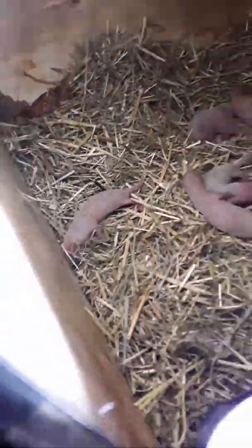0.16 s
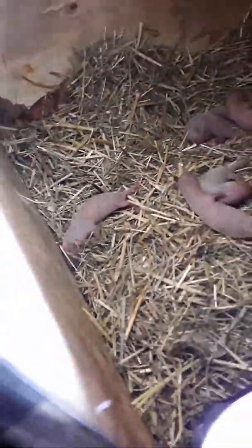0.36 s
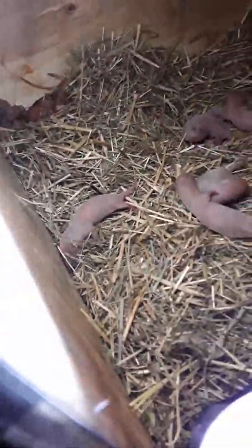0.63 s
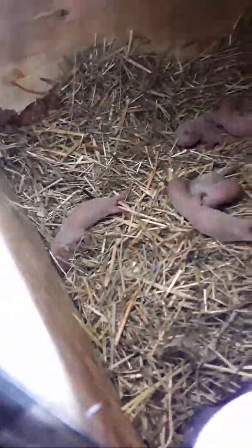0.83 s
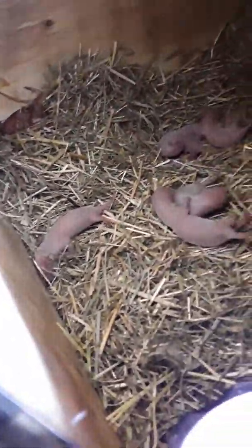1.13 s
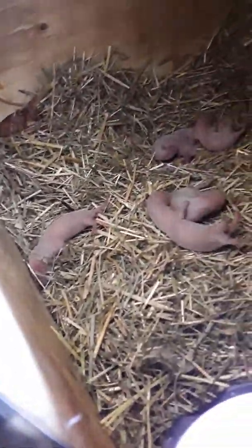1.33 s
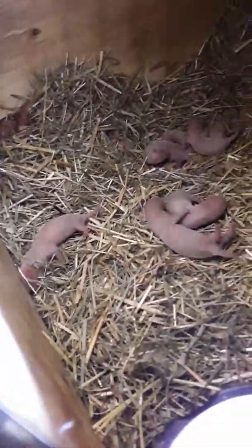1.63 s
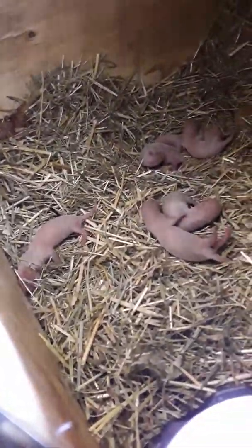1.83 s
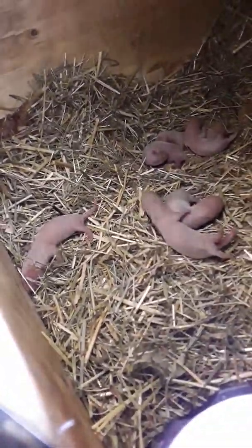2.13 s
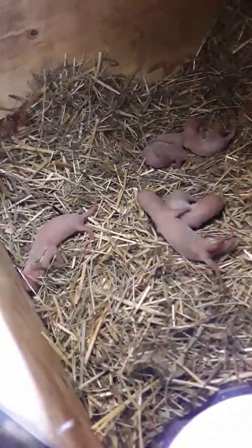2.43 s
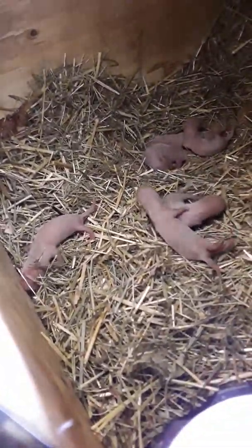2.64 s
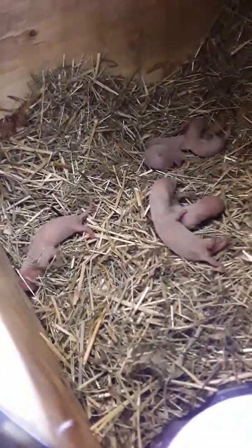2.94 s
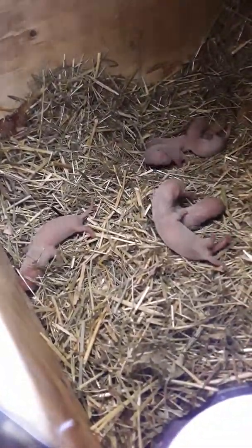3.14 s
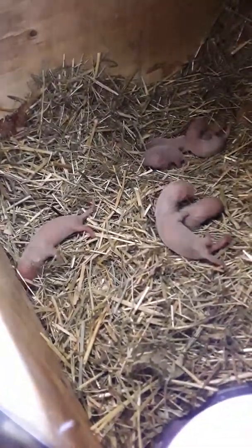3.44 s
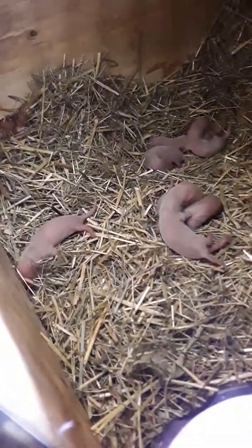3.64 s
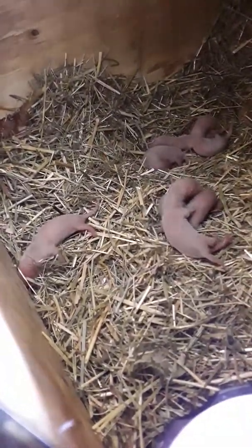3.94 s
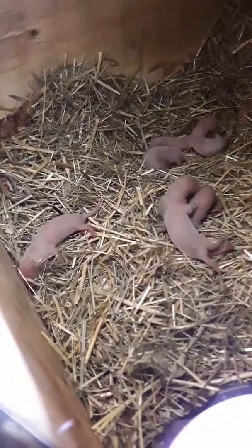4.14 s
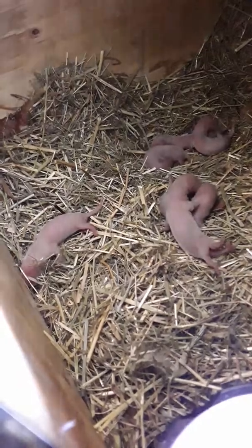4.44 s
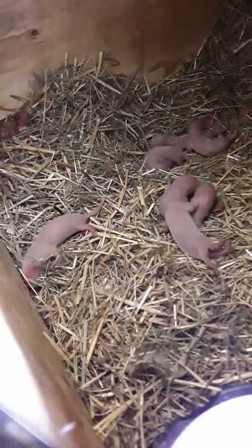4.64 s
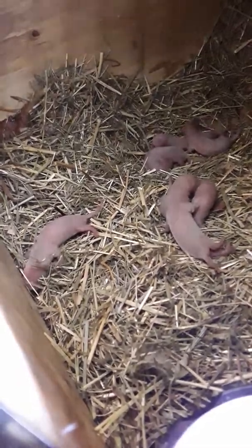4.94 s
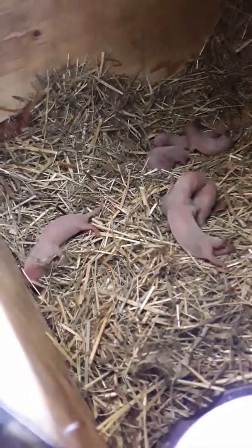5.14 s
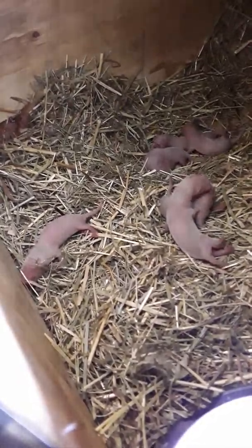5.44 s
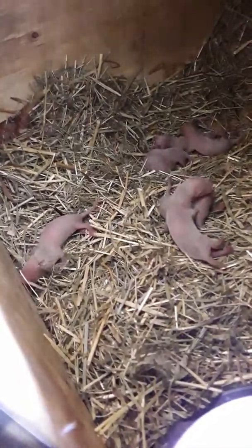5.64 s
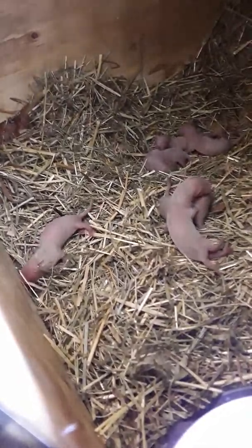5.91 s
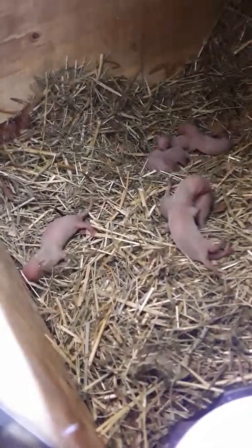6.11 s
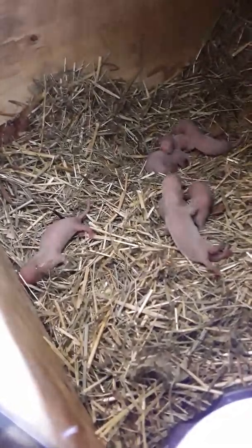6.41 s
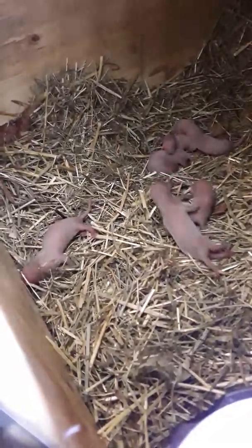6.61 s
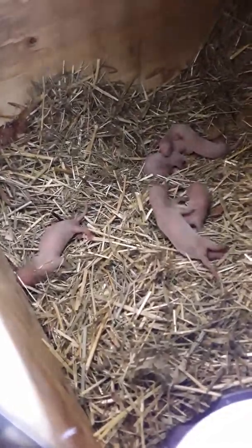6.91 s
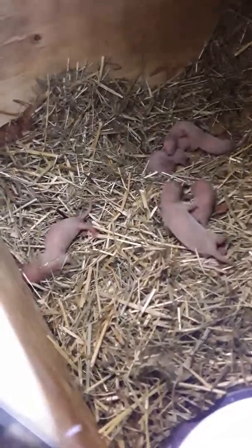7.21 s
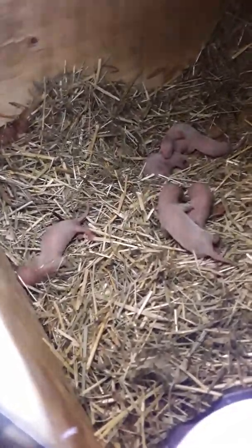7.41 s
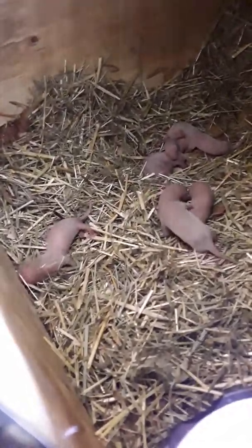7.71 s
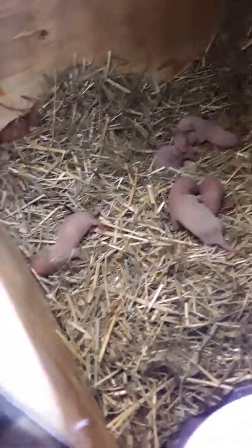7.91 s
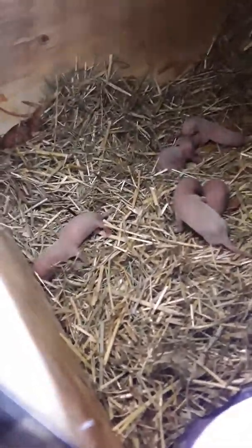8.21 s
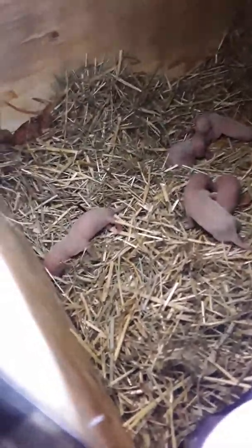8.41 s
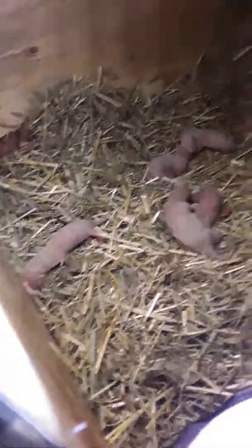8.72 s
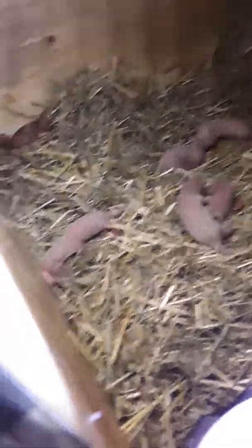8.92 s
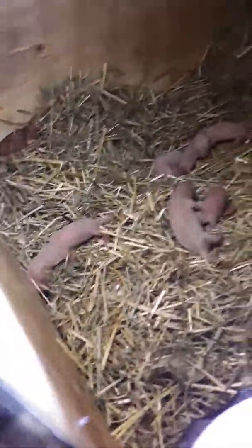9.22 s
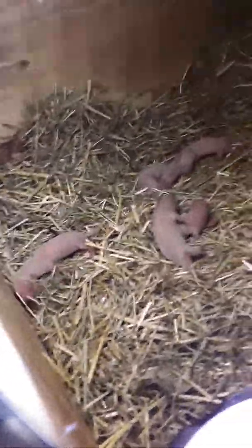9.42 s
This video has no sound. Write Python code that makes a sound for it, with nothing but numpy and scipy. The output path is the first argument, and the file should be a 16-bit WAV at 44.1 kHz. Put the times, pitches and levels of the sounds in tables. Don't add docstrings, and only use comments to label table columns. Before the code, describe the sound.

Close, dry straw rustling and crackling in a wooden nest box, tiny hoarse squeaks from baby animals, a few hard ticks and dull board bumps.

```python
import sys
import numpy as np
from scipy import signal
from scipy.fft import rfft, irfft, next_fast_len
from scipy.io import wavfile
from scipy.ndimage import uniform_filter1d, map_coordinates

SR = 44100
rng = np.random.default_rng(int(sys.argv[2]) if len(sys.argv) > 2 else 0)


def int16_out(signal):
    q = np.round(np.clip(np.atleast_2d(signal).T, -1, 1) * 32767)
    wavfile.write(sys.argv[1], SR, q.astype(np.int16))


def rack_gain(trim_db):
    fader = np.asarray(trim_db, float)
    return 10 ** (fader / 20)


N = 421596

# t/s, idle fidgeting level/dB, weight on the boards level/dB
LITTER = [(0, -41, -3), (.45, -55, -7), (.85, -50.5, 0.5), (1.25, -58.5, -3.5), (1.7, -50.5, -3),
          (2.05, -54.5, -8), (2.45, -48, -0.5), (2.8, -51.5, -1), (3.4, -77, 3.5), (3.85, -57, 2.5),
          (4.25, -57.5, -5.5), (4.75, -33.5, -2), (5.25, -58, -6), (6.0, -56.5, -7), (6.7, -57, -8),
          (6.87, -68.5, -9), (7.0, -58, -8), (7.4, -50.5, -4), (8.1, -53, -4.5), (9.56, -55.5, -5)]
# f/Hz, level/dB
DRY_STALKS = [(1470, -16), (2500, -8), (4210, -6), (5350, -7), (6250, -5), (8270, -1.5), (9220, -6),
              (9890, -6), (10200, -10), (11300, -19.5), (14200, -29), (16000, -41)]


def unit(x):
    return x / np.sqrt(np.mean(x ** 2) + 1e-20)


def along(points, hz):
    f, db = np.transpose(points)
    return rack_gain(np.interp(np.log(hz + 1), np.log(f + 1), db))


def curves(rows):
    s, *columns = np.transpose(rows)
    return [np.interp(np.arange(N) / SR, s, column) for column in columns]


def wobble(rate):
    knots = rng.standard_normal(int(N * rate / SR) + 4)
    return map_coordinates(knots, [np.arange(N) * rate / SR])


def filtered(x, response):
    m = next_fast_len(len(x) + 8192)
    return irfft(rfft(x, m) * response(np.fft.rfftfreq(m, 1 / SR)), m)[:len(x)]


def peak(f, hz, width):
    return 1j * f * width / (hz * hz - f * f + 1j * f * width)


def add(track, s, sound):
    part = track[round(s * SR):][:len(sound)]
    part += sound[:len(part)]


def grainy(count, spread_db, hold):
    steps = rng.normal(0, spread_db, count // hold + 1)
    return rng.standard_normal(count) * rack_gain(np.repeat(steps, hold)[:count])


def scratch(colour, grain_db, grain_rate, patchy_db):
    z = signal.stft(rng.standard_normal(N + 512), nperseg=512)[2]
    field = uniform_filter1d(rng.standard_normal(z.shape), size=8, axis=0)
    field = uniform_filter1d(field, size=24, axis=1)
    noise = signal.istft(z * rack_gain(patchy_db * unit(field)), nperseg=512)[1][:N]
    return unit(filtered(noise * rack_gain(grain_db * wobble(grain_rate)), colour))


def voice(seconds, hz, db, tilt_db, count):
    t = np.arange(seconds[0], seconds[-1], 1 / SR)
    waver = unit(uniform_filter1d(rng.standard_normal(len(t)), size=150))
    phase = 2 * np.pi * np.cumsum(np.interp(t, seconds, hz) * (1 + 0.007 * waver)) / SR
    k = np.arange(1, count + 1)[:, None]
    flicker = unit(uniform_filter1d(rng.standard_normal((count, len(t))), size=600, axis=1))
    tilt = (tilt_db + 0.5 * flicker) * np.log2(k)
    levels = rack_gain(np.interp(t, seconds, db) + tilt + 1.6 * flicker)
    ends = np.clip(np.minimum(t - t[0], t[-1] - t) / 0.01, 0, 1)
    sounding = k * np.max(hz) < SR / 3
    return np.sqrt(2) * ends * np.sum(levels * sounding * np.sin(k * phase), axis=0)


def kits():
    # start t/s, length t/s, starting f/Hz, glide f/Hz,
    # level/dB
    peep_calls = [(1.19, .12, 10350, -750, -47), (1.163, .024, 2070, -20, -58),
                  (2.278, 0.04, 2190, -25, -49), (2.52, 0.022, 2580, -15, -50),
                  (2.578, 0.063, 2640, -100, -45.5), (3.68, 0.022, 2630, -200, -49),
                  (4.06, 0.044, 2660, -200, -47), (4.226, .018, 1700, 480, -54),
                  (4.236, .036, 2190, -30, -52), (4.315, 0.06, 2170, -50, -54),
                  (3.983, .022, 2540, -40, -52), (4.135, .03, 2520, -30, -56), (2.54, .03, 2300, 100, -54),
                  (7.885, .06, 2560, 100, -56), (7.812, .02, 2850, 100, -55), (5.72, 0.026, 1100, 850, -53),
                  (5.742, .02, 2000, 60, -53), (5.305, .03, 2200, -20, -60), (5.335, .02, 1400, -100, -58),
                  (6.018, 0.026, 1900, 400, -54), (6.738, 0.022, 2440, 5, -56),
                  (6.778, 0.022, 2500, 500, -58), (6.992, .025, 2150, 10, -54),
                  (6.992, .025, 2580, 10, -57), (7.075, 0.048, 1500, 700, -62),
                  (7.273, 0.025, 1900, 350, -49), (7.425, .04, 1250, 350, -59),
                  (7.447, .035, 1750, 1100, -53), (8.04, 0.055, 2550, -30, -55),
                  (8.301, 0.018, 2640, -5, -45.5), (8.408, 0.034, 2530, -280, -50),
                  (7.486, .014, 3250, -100, -42), (7.768, .016, 3150, -100, -39)]
    # brightness [dB per octave], then rows of t/s, pitch f/Hz, level/dB
    squeal_calls = [
        (6, [(7.41, 690, -79), (7.44, 750, -77), (7.47, 775, -77), (7.5, 820, -73), (7.52, 890, -70), (7.56, 995, -69), (7.6, 1045, -71), (7.62, 1010, -73), (7.645, 940, -74)]),
        (-2, [(3.99, 1620, -58), (4.01, 1570, -58), (4.03, 1700, -54), (4.045, 1650, -56), (4.065, 1480, -60)]),
        (-1, [(4.283, 1075, -57), (4.3, 1060, -56), (4.315, 930, -60)]),
        (4, [(7.375, 850, -70), (7.405, 845, -71)]),
        (-2.5, [(8.595, 1130, -59), (8.62, 1235, -56), (8.66, 1270, -56), (8.685, 1195, -59), (8.705, 1165, -59), (8.735, 1200, -57), (8.765, 1235, -56), (8.79, 1190, -57), (8.81, 1100, -63)]),
    ]
    track = np.zeros(N)
    for start, length, hz, glide_hz, db in peep_calls:
        peep = voice([start, start + length], [hz, hz + glide_hz], [db, db - 3], -12, count=2)
        add(track, start, peep)
    for tilt_db, call in squeal_calls:
        s, hz, db = np.transpose(call)
        add(track, s[0], voice(s, hz, db, tilt_db, count=11))

    t = np.arange(SR // 10) / SR
    walls = rng.standard_normal(len(t)) * rack_gain(-60 * t / 0.14)
    wet = track + rack_gain(-8) * signal.fftconvolve(track, walls / np.linalg.norm(walls))[:N]

    def mouth(f):
        colour = (1 + 0.45 * peak(f, 2450, 900)) * (1 - 0.35 * peak(f, 3800, 900))
        return colour / (1 + (f / 7800) ** 10)

    return filtered(wet, mouth)


def wheezes():
    # start t/s, length t/s, level/dB, throat f/Hz
    cries = [(0, 0.11, -46, 2050), (0.15, 0.064, -48, 2190), (0.2, 0.081, -49, 2350),
             (0.276, 0.093, -50, 2520), (0.359, 0.19, -50, 2680), (0.54, 0.24, -55, 2700),
             (0.425, 0.32, -58.5, 5450), (0.859, 0.16, -46, 2490), (1.529, 0.39, -49.5, 2490),
             (3.778, 0.038, -38.5, 1740), (4, 0.27, -60.5, 2460), (5.364, 0.21, -54, 2410),
             (5.78, 0.13, -49.5, 2600), (5.971, 0.062, -53.5, 2680), (6.081, 0.37, -52.5, 2530),
             (6.909, 0.15, -58.5, 4850), (7.082, 0.27, -55, 2600), (7.781, 0.27, -52.5, 2630),
             (8.128, 0.16, -51, 2680), (8.198, 0.076, -52, 5070), (8.378, 0.043, -49.5, 4770),
             (8.47, 0.029, -48.5, 3400), (5.362, 0.25, -49, 7140), (5.662, 0.083, -53, 7350),
             (5.787, 0.11, -51, 8100), (4.499, 0.6, -49.5, 2050), (6.375, 0.26, -43.5, 2170),
             (8.808, 0.1, -56, 2460), (8.908, 0.07, -50.5, 2580), (9.381, 0.23, -54, 2500)]
    nose_hz, nose_width_hz, nose_db, fade_db = 7240, 690, -8, 0.5
    track = np.zeros(N + SR)
    for s, length, db, hz in cries:
        t = np.arange(round(length * SR)) / SR
        nose = lambda f: rack_gain(nose_db) * peak(f, nose_hz, nose_width_hz) ** 2
        breath = filtered(rng.standard_normal(2 * SR // 3), lambda f: peak(f, hz, 0.26 * hz) ** 2 + nose(f))
        ends = np.clip(np.minimum(t, length - t) / 0.0059, 0, 1)
        add(track, s, rack_gain(db - fade_db * t / length) * ends * unit(breath)[:len(t)])
    return track[:N] * rack_gain(1.2 * wobble(35))


def straw():
    # start t/s, length t/s, rustle level/dB, swell over the drag level/dB
    crawls = [(0, 0.1, -37, 1.5), (0.167, .087, -40, -15), (0.253, 0.072, -43, 12.5),
              (0.321, 0.054, -29.5, -7), (0.857, 0.25, -42, -3.5), (1.595, 0.3, -39.5, -10),
              (2.099, 0.16, -44.5, -17), (2.28, 0.085, -41, -1.5), (2.465, 0.17, -36, -10.5),
              (2.884, 0.14, -50, 11), (3.023, .027, -44.5, 0), (3.047, 0.065, -43.5, 2),
              (3.117, 0.081, -44, 2), (3.171, 0.16, -32.5, -4), (3.29, 0.19, -42.5, 7),
              (3.493, 0.082, -46, 9.5), (3.578, 0.15, -42, -3.5), (3.979, 0.26, -47.5, -7),
              (4.311, 0.14, -45, -2), (4.486, 0.061, -37, 8.5), (4.545, 0.35, -27.5, -6),
              (4.835, 0.22, -33.5, -6), (5.083, 0.028, -46.5, 17), (5.109, 0.0294, -27, -9),
              (5.356, 0.59, -45.5, -17), (3.902, 0.039, -50.5, 1), (6.325, 0.027, -38, -8),
              (6.357, 0.019, -48.5, 14), (6.927, 0.085, -65, 7), (6.373, 0.02, -39.5, 11),
              (6.392, 0.21, -31.5, -1), (6.598, 0.042, -26, -3.5), (7.319, 0.3, -69, -7),
              (8.813, 0.16, -50, -12), (9.373, 0.27, -47.5, -4.5)]
    # t/s, level/dB
    kicks = [(.375, -48), (1.116, -39.5), (1.373, -44), (1.465, -44), (1.6, -49), (1.93, -63),
             (2.009, -44.5), (2.165, -44.5), (4.065, -42), (1.847, -38), (2.363, -53), (2.638, -44.5),
             (2.707, -40.5), (2.802, -41.5), (2.973, -38.5), (3.781, -37.5), (4.681, -28), (5.7, -47),
             (6.101, -46), (4.17, -52), (3.995, -50), (6.242, -38), (6.994, -47), (3.73, -38.5),
             (7.224, -42), (7.593, -36.5), (7.774, -45.5), (7.93, -49), (2.4, -47), (8.2, -54), (8.39, -55),
             (8.472, -54), (8.984, -32.5), (9.171, -48), (9.223, -38.5)]
    # f/Hz, width f/Hz, lift level/dB
    pockets = [(2050, 1400, -7), (5950, 2700, 3.5), (7950, 990, 0), (10170, 630, 1.5)]
    # f/Hz, width f/Hz
    throat = [(2100, 600), (2750, 700)]
    # f/Hz, width f/Hz, level/dB
    box_modes = [(430, 60, 2), (650, 110, 1), (900, 200, -3), (1180, 260, -4)]
    settle_s = 0.24
    rest_db, wheeze_lag, hollow_lag = -49.5, 0.45, 0.88
    strain_db, mouth_open, mouth_shuts = -4.5, 0.51, 0.014

    t = np.arange(N) / SR
    idle_db, weight_db = curves(LITTER)
    power = rack_gain(2 * idle_db)
    for s, length, db, swell_db in crawls:
        add(power, s, rack_gain(2 * (db + swell_db * t[:round(length * SR)] / length)))
    for s, db in kicks:
        add(power, s, rack_gain(2 * (db - 60 * t[:SR // 2] / settle_s)))
    level = np.sqrt(np.abs(uniform_filter1d(power, size=100)))
    above_db = np.clip(20 * np.log10(level) - rest_db, 0, None)
    jerks = 1.3 * wobble(30)

    def heap(f):
        lifts = [1 + (rack_gain(db) - 1) * np.abs(peak(f, hz, w)) ** 2 for hz, w, db in pockets]
        return along(DRY_STALKS, f) * np.prod(lifts, axis=0)

    def box(f):
        modes = sum((-1) ** k * rack_gain(db) * peak(f, hz, w) for k, (hz, w, db) in enumerate(box_modes))
        return modes / (1 + (f / 1700) ** 4)

    hiss = rack_gain(jerks) * scratch(heap, grain_db=2, grain_rate=900, patchy_db=1.3)
    closed, opened = [scratch(lambda f: peak(f, hz, w) ** 2 + 0.4 * peak(f, 2600, 2600) ** 2,
                              grain_db=1.5, grain_rate=200, patchy_db=2) for hz, w in throat]
    turn = np.clip(mouth_open - mouth_shuts * above_db, 0, 1) * np.pi / 2
    breath = np.cos(turn) * closed + np.sin(turn) * opened
    hoarse = rack_gain(strain_db - wheeze_lag * above_db + jerks) * breath
    body = scratch(box, grain_db=1.2, grain_rate=40, patchy_db=1.2)
    hollow = rack_gain(weight_db - hollow_lag * above_db + jerks) * body
    return level * (hiss + hoarse + hollow)


def snaps():
    # t/s, peak level/dB, low share level/dB
    breaks = [(1.1179, -38, -18), (1.6666, -19, -20), (2.2288, -19.5, -27), (2.2805, -28, -11.5),
              (2.5701, -21, -17), (3.052, -10, -45), (3.1555, -24, -14), (3.1827, -3.5, -29),
              (3.2615, 1, -31), (3.3428, -7.5, -17.5), (3.4815, -9, -26.5), (3.5079, -2.5, -49),
              (7.0748, -19.5, -35), (7.2255, -25, -24), (7.5887, -17.5, -22), (8.8618, -23, -32),
              (8.986, -15, -27), (9.0224, -18, -24), (9.2226, -26.5, -11.5), (9.2783, -24, -31)]
    # t/s, peak level/dB, low share level/dB
    bends = [(2.314, -20, -13.5), (2.5, -24, -29), (2.607, -19, -22), (2.722, -19.5, -25),
             (3.082, -11, -35), (3.105, -14, -20), (3.221, -6.5, -30), (3.423, -8, -31), (6.104, -27, -35),
             (6.832, -40, -35), (7.008, -24, -33), (7.142, -26, -33), (7.194, -31, -35), (7.928, -35, -30),
             (8.04, -34, -25), (8.756, -29, -32)]
    # t/s, peak level/dB, low share level/dB
    claw_ticks = [(0.392, -22, -15), (.447, -24, -35), (.482, -25, -35), (.515, -35, -25),
                  (8.9845, -7, -26), (1.33, -27, -33), (1.5469, -28, -22), (4.382, -11, -11),
                  (4.3883, -7, -17), (4.3915, -1, -19.5), (3.2612, -3, -33), (3.3455, -6, -24),
                  (3.5077, -4, -43), (4.4412, -13.5, -9), (4.4455, -18, -20), (4.6752, 6, -22),
                  (4.6768, -2, -15), (4.689, 5, -29), (4.6935, -1, -10.5), (5.143, -17, -12),
                  (5.1505, -14.5, -18.5), (5.2898, -21, -38), (6.2322, 3, -21), (6.242, -8.5, -9.5),
                  (7.4915, -24.5, -4), (7.7737, -27.5, 1.5), (8.5687, -19, -19), (6.647, -28, -10),
                  (8.2435, -19, -35), (8.2508, -19, -33), (8.449, -36, -40)]
    high, low, t = np.zeros(N), np.zeros(N), np.arange(SR // 6) / SR
    tick = (1 - np.exp(-t / 0.0004)) * rack_gain(-60 * t / 0.0055)
    snap = (1 - np.exp(-t / 0.00055)) * (0.46 * rack_gain(-60 * t / 0.01) + 0.3 * rack_gain(-60 * t / 0.11))
    scuff = (1 - np.exp(-t / 0.004)) * rack_gain(-60 * t / 0.07)
    kinds = [(breaks, snap, 0.25), (bends, 0.68 * scuff, 0), (claw_ticks, 0.92 * tick, 0.9)]
    for events, shape, crack in kinds:
        size = np.linalg.norm(shape)
        for s, db, low_db in events:
            stub = np.sin(2 * np.pi * rng.uniform(3500, 10500, (3, 1)) * t).sum(axis=0)
            burst = shape * (grainy(len(t), 3, 24) + 0.28 * stub)
            burst[np.argmax(shape)] += crack * size
            add(high, s, rack_gain(db) * burst * size / np.linalg.norm(burst))
            add(low, s, rack_gain(db + low_db) * shape * rng.standard_normal(len(t)))

    def crisp(f):
        return along(DRY_STALKS, f) ** 1.25 / (1 + (3000 / (f + 1)) ** 4) + rack_gain(-35) * peak(f, 11800, 5000)

    dull = lambda f: peak(f, 2460, 6000) ** 2 / (1 + (f / 9000) ** 4)
    return rack_gain(3) * filtered(high, crisp) + rack_gain(15.5) * filtered(low, dull)


def crunches():
    # t/s, peak level/dB, f/Hz
    crushed = [(0.377, -35.5, 781), (0.685, -41, 840), (0.844, -30.5, 920), (1.464, -33, 697),
               (1.592, -31, 650), (1.847, -34, 590), (2.101, -33, 660), (2.206, -43, 557),
               (2.227, -31, 600), (2.28, -23.5, 625), (2.396, -35, 670), (2.458, -30.5, 877),
               (2.501, -26.5, 1010), (2.61, -29, 630), (2.706, -31, 676), (2.8, -31.5, 626),
               (2.889, -28, 457), (3.263, -26.5, 990), (3.407, -35, 673), (3.597, -30, 1010),
               (3.931, -33, 446), (4.324, -25.5, 593), (5.141, -30.5, 490), (6.762, -51, 1010),
               (7.116, -41, 560), (7.588, -37, 961), (7.655, -63, 673), (7.845, -33, 940),
               (8.983, -36, 910), (9.023, -52, 912), (9.489, -31, 910)]
    fall_s, trim_db = 0.22, -10.5
    track, t = np.zeros(N + SR), np.arange(SR // 8) / SR
    for s, db, hz in crushed:
        cavity = lambda f: peak(f, hz, 0.5 * hz) ** 2 + 0.47 * peak(f, 1.52 * hz, hz) ** 2
        ring = filtered(grainy(len(t), 4, 128), cavity)
        add(track, s, rack_gain(db + trim_db - 60 * t / fall_s) * (1 - np.exp(-t / 0.00068)) * unit(ring))
    return track[:N]


def creaks():
    rubs = [
        (8.875, .1, 220, 90, -53, 8400),
        (9.385, .17, 330, 110, -53, 10000),
        (5.89, .07, 160, 90, -59, 7000),
    ]
    track = np.zeros(N + SR)
    for s, length, first_rate, last_rate, db, hz in rubs:
        turns = np.cumsum(np.linspace(first_rate, last_rate, round(length * SR))) / SR
        slips = np.diff(np.floor(turns), prepend=0) * rack_gain(rng.normal(0, 2, len(turns)))
        add(track, s, rack_gain(db) * unit(filtered(slips, lambda f: peak(f, hz, 0.25 * hz) ** 2)))
    return track[:N]


def boards():
    # t/s, peak level/dB, hard-contact share level/dB, board f/Hz
    knocks = [(0.382, -30, -2, 226), (3.343, -25.5, 4, 183), (4.321, -31, -22, 202),
              (4.3825, -10.5, -1.5, 234), (4.39, -14, -0.5, 290), (4.4419, -18.5, 8.5, 287),
              (4.693, -26, -4, 282), (5.135, -25.5, -5, 190), (5.146, -25.5, 3.5, 300),
              (5.561, -36.5, -20, 424), (6.232, -9, 2.5, 250), (6.242, -7.5, 0.5, 238),
              (6.645, -31, 2.5, 266), (7.224, -20.5, -40, 255), (7.339, -27.5, -19, 304),
              (7.428, -31, -22, 178), (7.492, -27, -25, 400), (7.592, -27.5, -4.5, 191),
              (7.789, -19.5, -10, 304)]
    # f/Hz, width f/Hz
    panels = [(80, 49), (135, 120), (205, 108)]
    hums = [scratch(lambda f: peak(f, hz, w) ** 2, grain_db=1.5, grain_rate=30, patchy_db=1)
            for hz, w in panels]
    hum_db = -49 + curves(LITTER)[-1]
    track = rack_gain(hum_db) * unit(hums[0] + hums[1] + hums[2])
    blow = np.zeros(SR // 10)
    blow[0] = 1
    spread = lambda f: np.exp(-2j * np.pi * 1.68 * np.log(1 + f / 140))
    hard = filtered(blow, lambda f: spread(f) * peak(f, 628, 540) ** 2)
    for s, db, hard_db, board_hz in knocks:
        board = lambda f: peak(f, board_hz, 0.5 * board_hz) ** 2 + 0.5 * peak(f, 112, 105) ** 2
        soft = filtered(blow, lambda f: spread(f) * board(f))
        knock = soft / np.abs(soft).max() + rack_gain(hard_db) * hard / np.abs(hard).max()
        add(track, s, rack_gain(db - 4.5) * knock)
    return track


def shoves():
    # centre t/s, level/dB, board f/Hz
    pushes = [(.14, -48.5, 140), (.715, -47, 169), (.861, -40.5, 216), (7.03, -52, 138), (1.611, -45, 230),
              (1.866, -45, 167), (2.302, -43, 190), (2.91, -37, 122.5), (3.145, -46, 157),
              (3.365, -30.5, 133), (3.44, -37, 136), (3.63, -40.5, 198), (3.7, -34.5, 181),
              (3.795, -37, 165), (3.956, -43, 131), (4.1, -37, 162), (4.563, -37, 152), (4.988, -41, 138),
              (7.984, -38.5, 167), (8.135, -37.5, 81), (8.637, -37.5, 74), (8.76, -37.5, 77),
              (9.167, -35.5, 80.5)]
    # centre t/s, level/dB, f/Hz
    nudges = [(.811, -43, 430), (.871, -41.5, 610), (.948, -42.5, 894), (1.486, -45, 690),
              (1.607, -39.5, 656), (1.675, -44.5, 625), (2.112, -53, 670), (2.237, -41.5, 414),
              (2.303, -43, 430), (2.412, -41.5, 740), (2.488, -44, 660), (2.576, -38.5, 656),
              (2.731, -37.5, 445), (2.812, -46, 430), (2.973, -40, 1100), (3.195, -29.5, 1150),
              (3.235, -35.5, 1080), (3.429, -39, 1320), (6.605, -41.5, 780), (6.63, -37, 950),
              (4.33, -46, 390), (7.8, -40, 600), (9.234, -44, 690), (9.53, -46, 730)]
    track = np.zeros(N + SR)
    for events, length, looseness in [(pushes, 0.095, 0.45), (nudges, 0.046, 0.3)]:
        n = round(length * SR)
        for s, db, hz in events:
            width = looseness * hz
            modes = lambda f: peak(f, hz, width) ** 2 + 0.27 * peak(f, 1.71 * hz, width) ** 2
            ring = filtered(rng.standard_normal(SR // 4), modes)[-n:]
            add(track, s - length / 2, rack_gain(db) * unit(ring) * np.hanning(n))
    return track[:N]


def insect():
    # start t/s, end t/s, level/dB
    trills = [
        (.4, .72, -66),
        (3.55, 3.8, -67),
        (5.15, 5.4, -65),
        (5.68, 5.96, -69),
        (6.65, 6.95, -66),
        (8.65, 8.89, -68),
    ]
    # f/Hz, width f/Hz, level/dB
    wing = [(12800, 700, 0), (13350, 600, -1)]
    t = np.arange(N) / SR
    strokes = (1 + 0.8 * np.sin(2 * np.pi * 91 * t)) * rack_gain(wobble(40)) * rng.standard_normal(N)
    ring = unit(filtered(strokes, lambda f: sum(rack_gain(db) * peak(f, hz, w) ** 2 for hz, w, db in wing)))
    return ring * sum(rack_gain(db) * np.clip(np.minimum(t - a, b - t) / 0.025, 0, 1) for a, b, db in trills)


def shed_air():
    # f/Hz, level/dB
    air_colour = [(25, -27), (70, -4), (200, -10), (700, -16.5), (1500, -7.5), (2500, -21), (3700, -13.5),
                  (6000, -15), (10500, -48), (13500, -20), (15500, -55), (16500, -70)]
    return rack_gain(-61) * scratch(lambda f: along(air_colour, f), grain_db=1, grain_rate=200, patchy_db=1)


def scene():
    animals = kits() + wheezes()
    stalks = straw() + snaps() + crunches() + creaks()
    wood = boards() + shoves()
    return (animals + stalks + wood + insect() + shed_air())[None]


def roll_off(x):
    return signal.sosfilt(signal.butter(12, 16470, fs=SR, output="sos"), x)


def record(dry):
    def tone_limits(f):
        return np.where(f < 15830, 1, 0.05) * (f < 16480) / (1 + (26 / (f + 1)) ** 4)

    heard = filtered(dry[0], tone_limits)
    return roll_off(heard[None])


dry = scene()
out = record(dry)
int16_out(out)
```